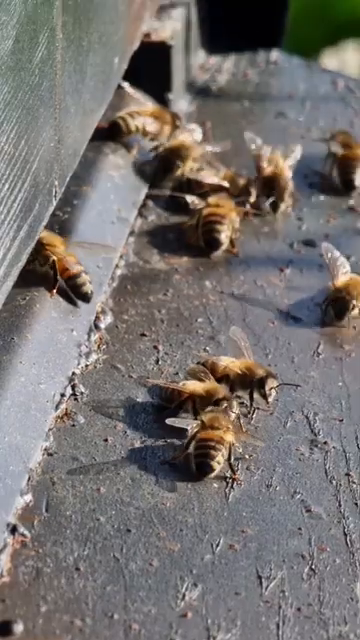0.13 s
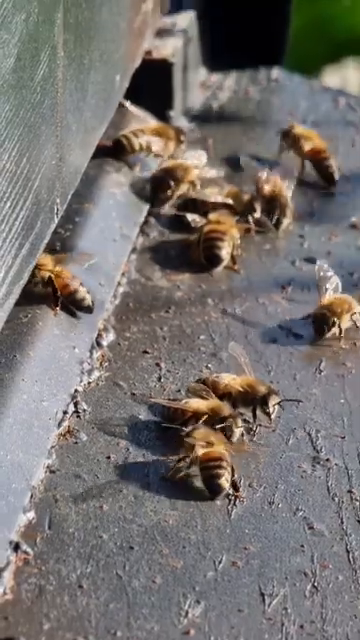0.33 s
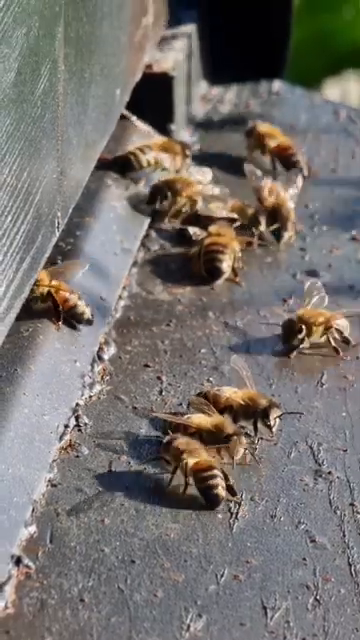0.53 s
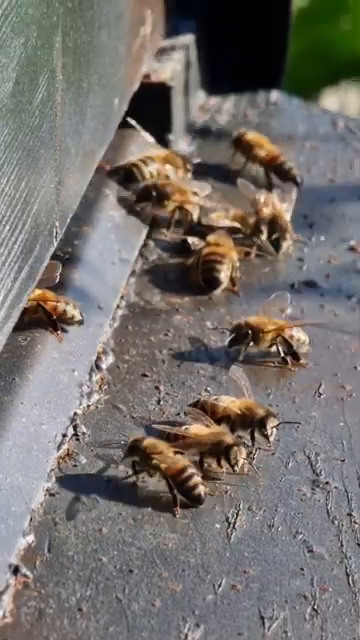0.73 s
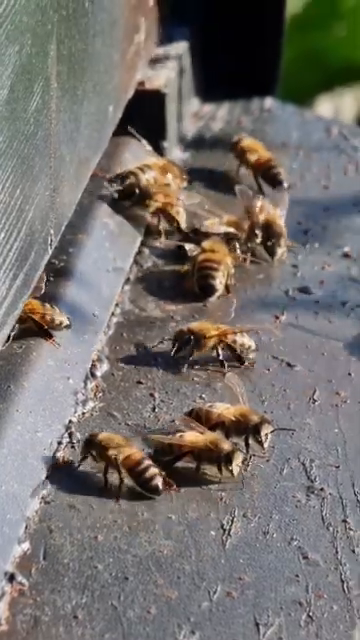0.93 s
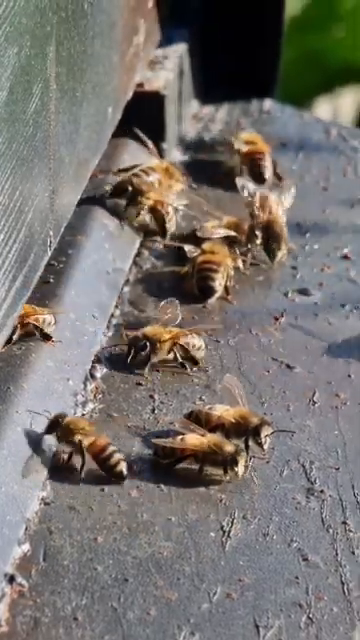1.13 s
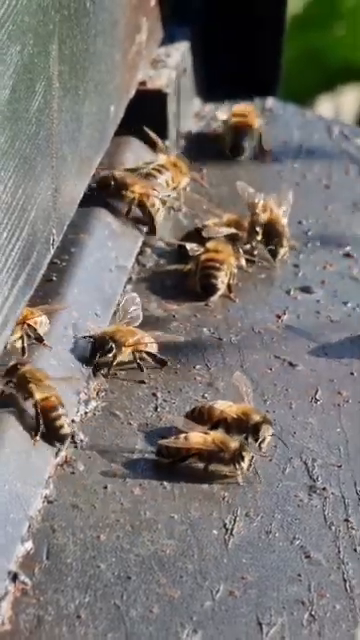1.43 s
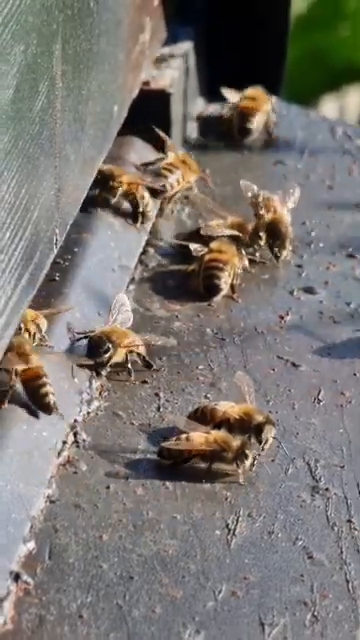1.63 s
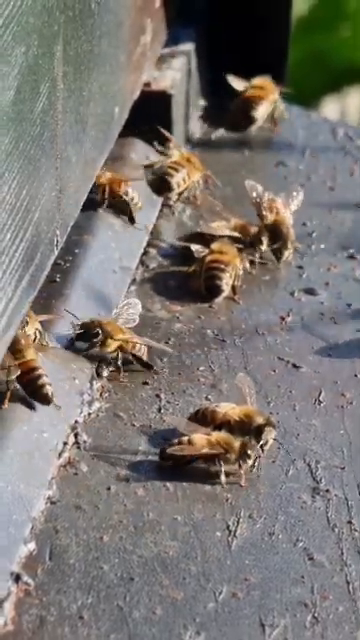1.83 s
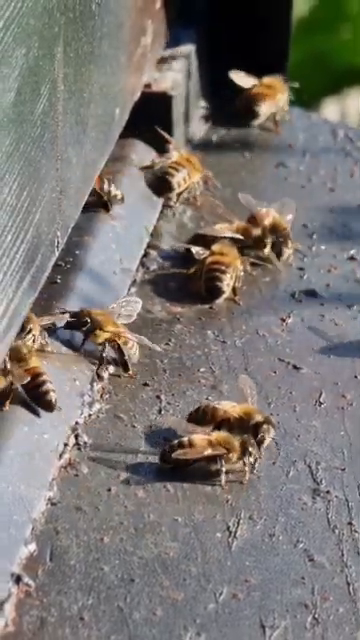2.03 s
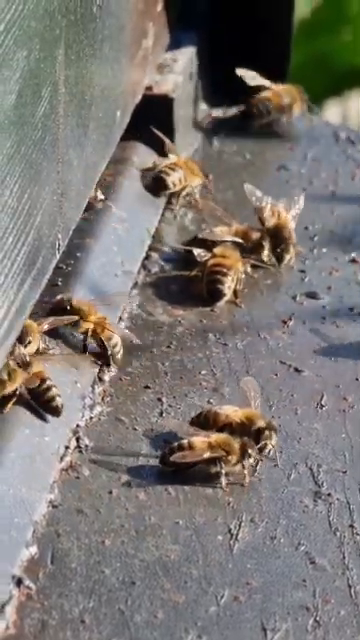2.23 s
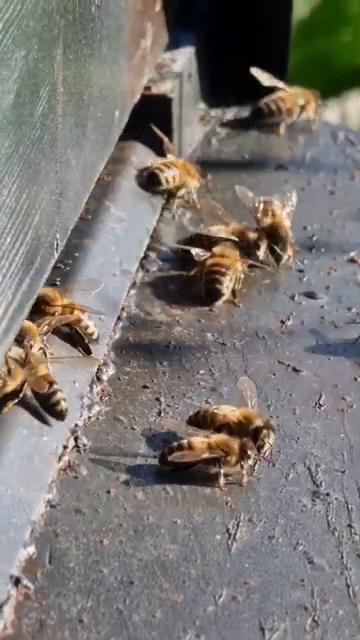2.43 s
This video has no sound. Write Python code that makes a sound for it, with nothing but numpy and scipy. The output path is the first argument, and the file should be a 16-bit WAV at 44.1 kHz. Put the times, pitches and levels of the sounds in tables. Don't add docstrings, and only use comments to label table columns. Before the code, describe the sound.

Bees drone deeply on a hive landing board while wind buffets the microphone and leaves rush faintly

```python
import sys
import numpy as np
from scipy import signal
from scipy.fft import rfft, irfft
from scipy.io import wavfile

SR = 44100
rng = np.random.default_rng(int(sys.argv[2]) if len(sys.argv) > 2 else 0)


def log_audio(samples):
    frames = np.atleast_2d(samples).T
    limited = np.clip(frames, -1, 1)
    pcm = np.round(limited * 32767).astype(np.int16)
    wavfile.write(sys.argv[1], SR, pcm)


def to_linear_factor(level_db):
    exponent = np.asarray(level_db, float) / 20
    return 10 ** exponent


N = 114219


def rms_one(x):
    return x / np.sqrt(np.mean(x ** 2) + 1e-20)


def in_time(rows):
    s, *columns = np.transpose(rows)
    return [np.interp(np.arange(N) / SR, s, c) for c in columns]


def at_hz(points, hz):
    if not np.ndim(points):
        return points + 0 * hz
    table = np.array(points)
    return np.interp(np.log(hz), np.log(table[:, 0]), table[:, 1])


def drift(rate):
    r = np.exp(-80 * np.pi * rate / SR)
    noise = rng.standard_normal(N // 40 + 2002)
    slow = signal.lfilter([1], [1, -2 * r, r * r], noise)[2000:]
    return np.interp(np.arange(N) / 40, np.arange(len(slow)), rms_one(slow - slow.mean()))


def panned(pan_db):
    return to_linear_factor(np.array([pan_db / 2, -pan_db / 2]))


def wing_phase(hz, wander, rate):
    return 2 * np.pi * np.cumsum(hz * (1 + wander * drift(rate))) / SR


def field(colour, alike, pan_db, phase, patchy_db, rate, count, lag_s=0):
    hz = np.arange(N // 2 + 1) * SR / N + 1e-3
    shared, *own = rfft(rng.standard_normal((3, N)))
    coherence = np.clip(at_hz(alike, hz), 0, 1)
    late = (at_hz(phase, hz) + 2 * np.pi * hz * lag_s) * [[0], [1]]
    both = np.sqrt(coherence) * shared * np.exp(-1j * late) + np.sqrt(1 - coherence) * np.array(own)
    both = both * to_linear_factor(at_hz(colour, hz)) * panned(at_hz(pan_db, hz))
    low_hz, high_hz = colour[0][0], colour[-1][0]
    place = np.log(hz / low_hz) / np.log(high_hz / low_hz) * count
    out, together = 0, drift(rate / 4)
    for k in range(count + 1):
        share = np.clip(1 - abs(place - k), 0, 1) * (place > 0) * (place < count)
        flicker_db = patchy_db * (1.16 * together + drift(rate))
        out = out + irfft(both * share, N) * to_linear_factor(flicker_db)
    return out / np.sqrt(np.mean(out.mean(axis=0) ** 2))


LOW_PHASE = 0.18
# time_s, level_db, left_right_db
WIND_LEVEL = [(.13, -36, -8), (.17, -39, -6.5), (.3, -35, -7), (.5, -35.5, -0.5), (.7, -38.5, -3.5),
              (1.0, -37, 0.5), (1.2, -39.5, -2), (1.33, -35.5, -7.5), (1.55, -36.5, -5.5), (1.8, -37, -8.5),
              (2.0, -36, -5), (2.1, -38.5, -1), (2.25, -30.5, 5), (2.4, -38, 6), (2.49, -39, -2),
              (2.56, -35, -6)]
# frequency_hz, density_db per Hz
WIND_SPECTRUM = [(11, -62), (18, -21.5), (53, -3.5), (75, -5.5), (97, -2.5), (119, -21), (130, -11),
                 (170, -34), (290, -120)]
# frequency_hz, coherence (0-1)
WIND_COHERENCE = [(25, .05), (60, 0.28), (120, 0.56)]
# centre_s, peak_db, pitch_hz, length_s, left_right_db
WIND_BUFFETS = [
    (0.259, -29.5, 86.6, 0.033, -12),
    (0.542, -23.5, 67, 0.02, 9),
    (1.539, -28, 63.8, 0.035, 3),
    (1.995, -26.5, 66.5, 0.031, -11),
    (2.208, -23, 61, 0.011, 18),
    (2.262, -28.5, 77.8, 0.019, 19.5),
    (2.321, -33, 71.5, 0.025, -17),
    (2.556, -24.5, 55, 0.011, -4),
]


def wind():
    level_db, pan_db = in_time(WIND_LEVEL)
    rumble = field(WIND_SPECTRUM, WIND_COHERENCE, 0, LOW_PHASE, patchy_db=0.7, rate=27.0, count=4)
    out = to_linear_factor(level_db) * panned(pan_db) * rumble
    t = np.arange(N) / SR
    for s, db, hz, length, pan_db in WIND_BUFFETS:
        buffet = np.exp(-((t - s) / length) ** 2) * np.sin(2 * np.pi * hz * (s - t))
        out += to_linear_factor(db) * panned(pan_db)[:, None] * buffet
    crack_s, width_s, crack_db = 2.2025, .0011, -21
    out[0] -= to_linear_factor(crack_db) * np.exp(-((t - crack_s) / width_s) ** 2)
    return out


OVERTONE_LOSS_DB = 20
# time_s, pitch_hz, level_db
NEAR_BEAT = [(.13, 85.85, -33), (.17, 87.7, -40), (.22, 87.95, -38), (.45, 88.43, -41.5),
             (.6, 71.83, -37.5), (.78, 62.73, -31), (.9, 64.17, -37), (1.01, 88, -40.5), (1.1, 82.4, -34.5),
             (1.35, 86.93, -38), (1.45, 85.74, -39.5), (1.55, 80.36, -41), (1.68, 89.5, -33),
             (1.82, 87.4, -32), (1.95, 66, -38.5), (2.31, 72, -37.5), (2.47, 62, -42), (2.59, 58.7, -43)]


def near_bee():
    hz, level_db = in_time(NEAR_BEAT)
    turn = wing_phase(hz, wander=.03, rate=11.1)
    tone = np.sqrt(2) * (np.sin(turn) + to_linear_factor(-OVERTONE_LOSS_DB) * np.sin(2 * turn))
    swell_db = 1.0 * drift(9.1)
    return tone * to_linear_factor(level_db - 2.5 + swell_db) * panned(-3)[:, None]


# time_s, level_db
CROWD_LEVEL = [(0.13, -47.5), (1.67, -44), (1.71, -49), (1.97, -40.5), (2.03, -46), (2.12, -41.5),
               (2.59, -44)]
# pitch_hz, level_db, left_right_db
CROWD_BEATS = [(107.7, -1.5, -1), (125.3, -4.5, .5), (142.5, -4.5, -6.5), (161.2, -4.5, -2),
               (172.4, -7, -3), (202.3, -5, -5.5), (216.3, -7.5, 1.5), (243.2, -8.5, -3)]
# frequency_hz, density_db per Hz
AIR_SPECTRUM = [(65, -20.5), (110, -9), (119, -3), (140, -2), (226, -8.5), (269, -12), (440, -23.5),
                (570, -55), (970, -120)]


def bees():
    level_db, = in_time(CROWD_LEVEL)
    wings = 0
    for hz, db, pan_db in CROWD_BEATS:
        turn = wing_phase(hz, wander=.035, rate=4.84) + 2 * np.pi * rng.random()
        tone = sum(to_linear_factor(-OVERTONE_LOSS_DB * k) * np.sin((k + 1) * turn) for k in range(4))
        swell = to_linear_factor(db + 3.0 * drift(4.9))
        sway = to_linear_factor(3.5 * drift(2.7) * [[1], [-1]])
        wings = wings + tone * swell * panned(pan_db)[:, None] * sway
    air = field(AIR_SPECTRUM, 0.74, -4, LOW_PHASE, patchy_db=1.5, rate=12.0, count=5)
    return to_linear_factor(level_db) * (to_linear_factor(-3.5) * rms_one(wings) + air)


# time_s, level_db
ROAR_LEVEL = [(0.13, -50), (1.01, -48), (1.1, -47.5), (1.78, -46.5), (1.79, -49.5), (1.91, -46),
              (2.42, -44.5), (2.59, -46)]
# frequency_hz, density_db per Hz
ROAR_SPECTRUM = [(400, -13.5), (520, -6.5), (620, -8.5), (790, -1.5), (900, -2.5), (1340, -4.5), (1430, -8),
                 (2000, -21.5)]
# frequency_hz, left_right_db
ROAR_BALANCE = [(400, -0.5), (550, 1), (780, 5.5), (950, -0.7), (1180, -2.5), (1400, -0.5), (2000, 4.5)]
# frequency_hz, coherence (0-1)
ROAR_COHERENCE = [(420, 0.3), (550, 0.63), (680, 0.44), (820, 0.78), (1070, 0.44), (1250, 0.7),
                  (1650, 0.56), (2000, 0)]
# frequency_hz, phase_radians
ROAR_LAG = [(420, 0.46), (620, 0.66), (850, 1.02), (1060, 0.42), (1300, 2), (1520, 2.04), (1900, 2)]
# frequency_hz, density_db per Hz
LEAF_SPECTRUM = [(1120, -26.5), (1900, 0.5), (2190, -1), (3080, -3), (4870, -9.5), (6420, -20),
                 (8200, -48.5), (10700, -80), (18000, -120)]
# frequency_hz, left_right_db
LEAF_BALANCE = [(2000, 1.2), (3000, 1.8), (4300, -4.5), (5200, -0.2), (6500, 8.5), (8000, 22.5)]


def distance():
    level_db, = in_time(ROAR_LEVEL)
    roar = field(ROAR_SPECTRUM, ROAR_COHERENCE, ROAR_BALANCE, ROAR_LAG, patchy_db=1.17, rate=6.0, count=7)
    leaves = field(LEAF_SPECTRUM, 0.16, LEAF_BALANCE, 0, patchy_db=0.64, rate=20.0, count=6, lag_s=0.00027)
    leaves_db = -58 + 0.091 * (level_db - level_db.mean())
    return to_linear_factor(level_db) * roar + to_linear_factor(leaves_db) * leaves


# pitch_hz, level_db, left_right_db
FLIER_BEATS = [(267.4, -0.5, 3), (233, -3, -.6), (287.3, -11, .3)]


def fliers():
    level_db, = in_time(ROAR_LEVEL)
    out = 0
    for hz, db, pan_db in FLIER_BEATS:
        turn = wing_phase(hz, wander=0.00801, rate=2.94)
        swell = to_linear_factor(db + 8 * drift(5.0))
        for k in range(2, 7):
            late = at_hz(ROAR_LAG, k * hz) * np.array([[0], [1]])
            balance = panned(pan_db + at_hz(ROAR_BALANCE, k * hz))[:, None]
            gain = to_linear_factor(at_hz(ROAR_SPECTRUM, k * hz)) * balance
            out = out + gain * swell * np.sin(k * turn - late)
    return to_linear_factor(level_db - 7.5) * rms_one(out)


# frequency_hz, density_db per Hz
HISS_SPECTRUM = [(8000, -26.5), (8300, -14.5), (8900, -13.5), (12300, -2), (14600, -2.6), (15700, -7.5)]
# frequency_hz, left_right_db
HISS_BALANCE = [(8200, 12), (9500, 15.5), (11000, 9), (12500, 1), (14000, 4), (15500, 5.5)]


def hiss():
    return to_linear_factor(-81.5) * field(HISS_SPECTRUM, 0, HISS_BALANCE, 0, patchy_db=1.2, rate=6.6, count=16)


# start_s, length_s, from_hz, to_hz, level_db
BIRD_CHIRPS = [
    (.205, .045, 4820, 5380, -62),
    (.575, .035, 5250, 5050, -67),
    (.985, .02, 4400, 4950, -62),
    (.612, .025, 3850, 3700, -60),
    (.635, .025, 3550, 3450, -61),
    (1.105, .035, 3480, 3780, -58),
    (1.655, .03, 5150, 5250, -65),
    (1.285, .015, 2850, 2950, -61),
]


def birds():
    out, blur = np.zeros(N), 1 + .006 * drift(140.0)
    for s, length, from_hz, to_hz, db in BIRD_CHIRPS:
        u = np.arange(int(length * SR)) / (length * SR)
        i = int(s * SR)
        hz = (from_hz + (to_hz - from_hz) * u) * blur[i:i + len(u)]
        whistle = np.sin(2 * np.pi * np.cumsum(hz) / SR)
        out[i:i + len(u)] += to_linear_factor(db) * np.sin(np.pi * u) * whistle
    return out * panned(1.5)[:, None]


def scene():
    return wind() + near_bee() + bees() + distance() + fliers() + hiss() + birds()


def low_pass(x):
    return signal.sosfilt(signal.butter(12, 15490, fs=SR, output="sos"), x)


def record(dry):
    start_s, start_pressure, fade_s = .12535, -.026, .004
    i = int(start_s * SR)
    since = np.arange(N) - i
    step = (start_pressure - dry[:, i:i + 1]) * np.exp(-np.maximum(since, 0) / (fade_s * SR))
    mix = (dry + step) * (since >= 0)
    return low_pass(mix)


dry = scene()
out = record(dry)
log_audio(out)
```